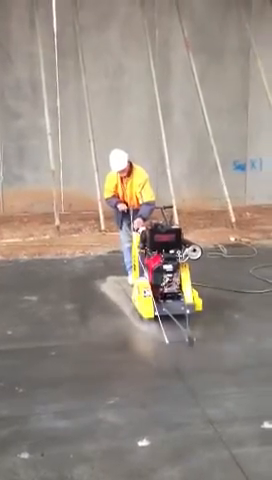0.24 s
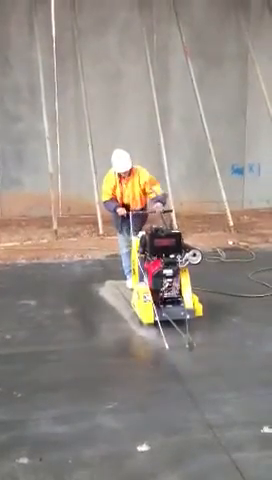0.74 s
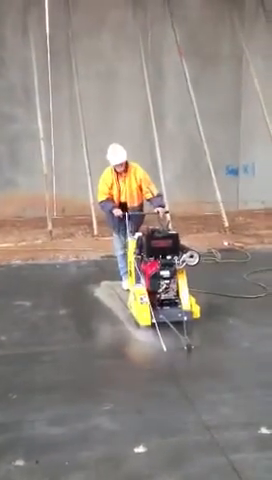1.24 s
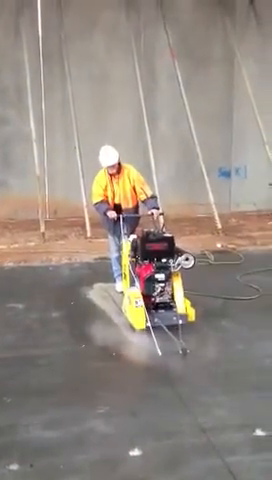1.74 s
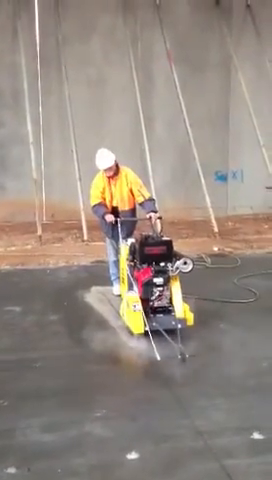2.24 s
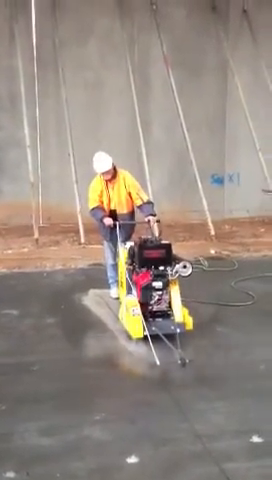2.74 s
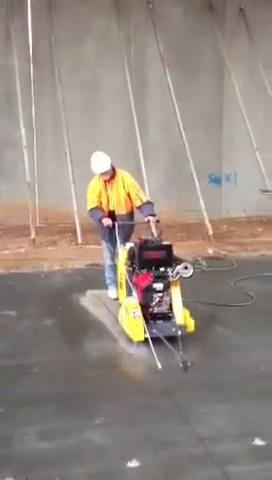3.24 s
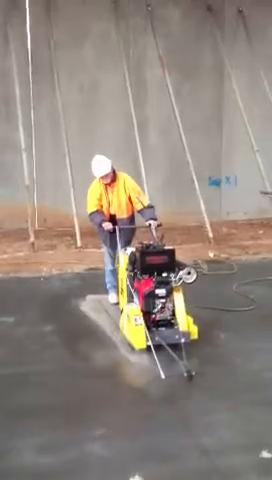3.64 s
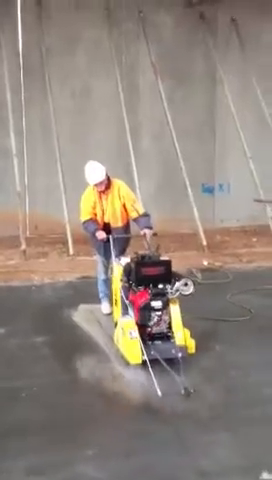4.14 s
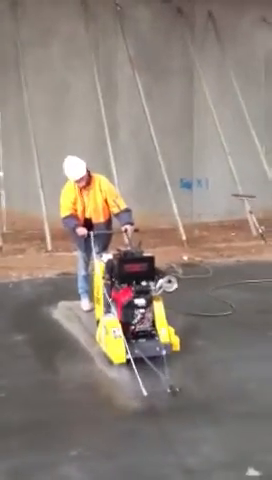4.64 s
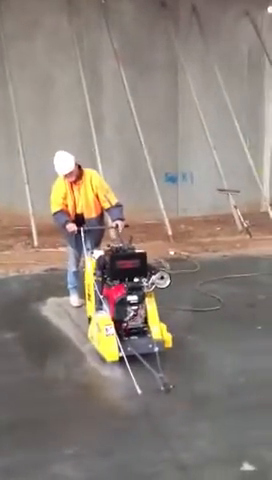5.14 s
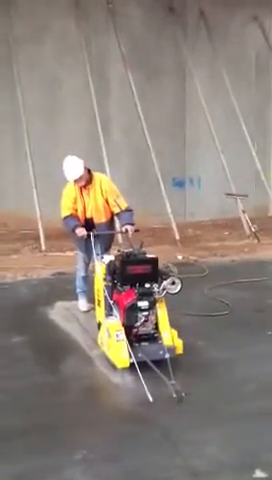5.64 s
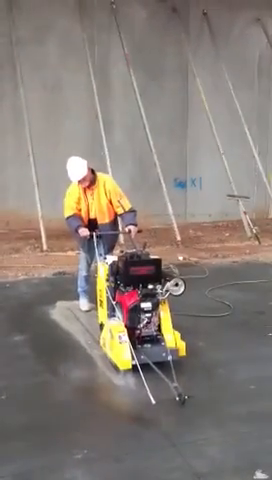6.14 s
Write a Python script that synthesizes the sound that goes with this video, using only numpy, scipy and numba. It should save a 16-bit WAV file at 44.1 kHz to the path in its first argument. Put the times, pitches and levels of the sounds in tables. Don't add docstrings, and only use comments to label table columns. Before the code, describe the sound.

Continuous bright, gritty shriek of a diamond blade grinding concrete, with an unsteady petrol engine throbbing quietly underneath, heard from some metres away.

```python
import sys
import numpy as np
from scipy import signal
from scipy.fft import rfft, irfft
from scipy.io import wavfile
from scipy.ndimage import uniform_filter1d
from numba import njit

SR = 44100
rng = np.random.default_rng(int(sys.argv[2]) if len(sys.argv) > 2 else 0)


def materialize(psi):
    bounded = np.clip(np.atleast_2d(psi).T, -1, 1)
    quanta = np.round(bounded * 32767).astype(np.int16)
    wavfile.write(sys.argv[1], SR, quanta)


def volts_from_db(level):
    exponent = np.asarray(level, float) / 20
    return 10 ** exponent


N = 282240
TIME = np.arange(N) / SR


def level(x, db):
    return x * volts_from_db(db) / np.sqrt(np.mean(x ** 2))


def curves(table):
    s, *columns = np.transpose(table)
    return [np.interp(TIME, s, c) for c in columns]


def walk(rate_hz):
    hold = int(SR / rate_hz)
    steps = np.repeat(rng.standard_normal(N // hold + 1), hold)
    return 1.3 * uniform_filter1d(uniform_filter1d(steps, hold), hold)[:N]


def bump(centre_s, length_s):
    return np.exp(-(2 * (TIME - centre_s) / length_s) ** 2)


def colour(x, points, lo_hz, hi_hz):
    hz = np.arange(1, N // 2 + 2) * SR / N
    points_hz, points_db = np.array(points).T
    db = np.interp(np.log(hz), np.log(points_hz), points_db)
    edges = 1 / np.sqrt((1 + (lo_hz / hz) ** 12) * (1 + (hz / hi_hz) ** 12))
    return irfft(rfft(x) * volts_from_db(db) * edges, N)


@njit
def svf(x, hz, width):
    y, band, low = np.empty(len(x)), 0., 0.
    for i in range(len(x)):
        g, k = np.tan(np.pi * hz[i] / SR), width / hz[i]
        v = (band + g * (x[i] - low)) / (1 + g * (g + k))
        band, low, y[i] = 2 * v - band, low + 2 * g * v, k * v
    return y


def grit(scatter_db):
    size_db = scatter_db * uniform_filter1d(rng.standard_normal(N), size=24)
    return rng.standard_normal(N) * volts_from_db(size_db)


def mode(scratch, hz, width_hz):
    centre_hz = hz * (1 + 0.0022 * walk(4.0))
    once = svf(scratch, centre_hz, 1.37 * width_hz)
    return level(svf(once, centre_hz, 1.37 * width_hz), 0)


def blade_ring(depth):
    # centre in Hz, width in Hz,
    # level in dB with the blade shallow, half in, deep.
    blade_modes = [(1700, 80, -24, -23.5, -25), (1922, 40, -24, -24.5, -28), (2035, 50, -23, -24.5, -27),
                   (2450, 60, -29, -29.0, -34), (2885, 70, -24, -27.0, -33), (3720, 140, -14, -17.5, -22),
                   (3850, 80, -20, -21.0, -22), (4030, 60, -20, -23.0, -21), (4262, 70, -17, -16.5, -24),
                   (4400, 80, -20, -21.0, -22), (4750, 110, -16, -17.0, -15), (4872, 60, -14, -14.0, -19)]
    higher_modes = [(5300, 80, -16, -15.0, -13), (5390, 70, -19, -15.0, -14), (5492, 60, -14, -14.0, -11),
                    (5985, 100, -15, -13.5, -12), (6135, 90, -13, -13.0, -12),
                    (6820, 130, -22, -20.5, -18), (7290, 90, -18, -17.0, -18), (7388, 70, -17, -17.5, -20),
                    (7720, 80, -20, -24.5, -28), (8164, 70, -24, -24.5, -26), (8390, 80, -21, -24.0, -25),
                    (8640, 80, -21, -21.0, -23), (9325, 80, -25, -23.5, -20), (9800, 80, -21, -24.0, -28)]
    # centre in seconds, length in seconds, mode in Hz, boost in dB.
    sings = [(1.87, .25, 4262, 7), (1.15, .2, 4262, 4), (2.55, .3, 5492, 4), (3.05, .3, 5492, 4),
             (2.05, .2, 4872, 4), (2.7, .3, 4872, 3), (4.0, .2, 4872, 4), (3.55, .3, 1922, 5),
             (5.3, .6, 5492, 2.5), (4.5, .5, 5985, 2.5)]
    scratch = grit(5.9)
    ring = np.zeros(N)
    for k, (hz, width_hz, *depth_db) in enumerate(blade_modes + higher_modes):
        mode_db = np.interp(depth, (.1, .5, .9), depth_db) + 1.0 * walk(9) + .3 * walk(2.5)
        for s, length_s, sing_hz, boost_db in sings:
            if sing_hz == hz:
                mode_db = mode_db + boost_db * bump(s, length_s)
        own_scratch = np.roll(scratch, k * SR // 5)
        ring += volts_from_db(mode_db) * mode(own_scratch, hz, width_hz)
    return ring


def blade():
    # frequency in Hz, level in dB per Hz.
    scrape_points = [(820, -49), (1400, -12.5), (1710, -10), (2620, -12.5), (3200, -9), (3710, -4),
                     (6110, -3), (7310, -5.5), (7760, -7.5), (10500, -5.5), (12300, -11), (13800, -11),
                     (15100, -15.5)]
    # centre in seconds, change in dB, length in seconds.
    bites = [(0.332, -1.5, 0.18), (0.883, -4.5, 0.091), (1.26, -2.5, .06), (1.54, -4.5, 0.066),
             (1.72, 2, 0.041), (1.85, -3, .1), (1.973, 2, .05), (2.127, -1.5, 0.075), (2.208, 3.5, 0.035),
             (2.523, 2, .06), (3.01, 3, 0.034), (3.25, -2, .08), (3.62, 2.6, 0.15), (3.795, 0.5, .06),
             (3.9, -3.5, 0.053), (3.99, 0, 0.07), (4.144, -4, .14), (4.85, -1.5, .1), (5.478, 2, .05),
             (5.59, -2, 0.11), (6.4, -1, 0.042)]
    # low edge in Hz, high edge in Hz, level in dB shallow, half in, deep,
    # share of each bite.
    rim_layers = [
        (1580, 2780, -27.5, -28, -29, 0.64),
        (3420, 7470, -15.5, -15.5, -16, 0.73),
        (8130, 30000, -23.2, -21.5, -22, 0.51),
    ]
    bite_db = sum(db * bump(s, length_s) for s, db, length_s in bites)
    depth = TIME / TIME[-1]
    chatter = volts_from_db(.35 * walk(12) + .5 * walk(30))
    scrape = level(colour(grit(5.3), scrape_points, 1, SR), -0.57)
    both = chatter * (scrape + level(blade_ring(depth), -4.0))
    flat = [(1, 0), (SR, 0)]
    cut = np.zeros(N)
    for lo_hz, hi_hz, *depth_db, share in rim_layers:
        layer_db = np.interp(depth, (.1, .55, .75), depth_db) + share * bite_db + 0.5 * walk(9)
        cut += volts_from_db(layer_db) * level(colour(both, flat, lo_hz, hi_hz), 0)
    return cut


def exhaust(cycle_hz, phase):
    # multiple of the cycle, level in dB.
    firing = [(3, -20), (4, -33), (5, 2), (6, 2.5), (7, -6), (8, -5), (9, -2), (10, -15), (11, -5),
              (12, -6), (13, -20), (14, -11), (15, -4), (16, -7), (17, -20), (18, -15)]
    # centre in Hz, width in Hz, boost in dB.
    muffler = [(144, 16, 3), (171, 16, 4), (222, 14, 11), (314, 14, 12), (345, 14, 5), (431, 13, 8.5)]
    partials = []
    for multiple, db in firing:
        boost_db = sum(b / (1 + (2 * (multiple * cycle_hz - f) / w) ** 2) for f, w, b in muffler)
        unsteady = .07 * multiple
        partial_db = db + boost_db + 1.4 * unsteady * walk(5)
        angle = multiple * phase + .17 * multiple ** 2 + .3 * unsteady * walk(9)
        partials.append(volts_from_db(partial_db) * np.cos(angle))
    return partials


def engine():
    # time in seconds, engine cycles per second.
    speed = [(0, 28.1), (.3, 27.3), (.88, 29.5), (1.08, 28.3), (1.29, 25.7), (1.48, 26.8), (1.76, 29.6),
             (1.96, 29.9), (2.37, 26.3), (2.72, 29.4), (3.15, 28.6), (3.68, 28.1), (4.0, 26.0),
             (4.48, 29.1), (4.92, 29.4), (5.61, 27.9), (6.15, 27.7), (6.4, 28.2)]
    # time in seconds, exhaust level in dB.
    throttle = [(0, -31), (.27, -32), (.5, -32), (.78, -29.5), (.92, -33.5), (1.1, -30.5), (1.5, -29),
                (1.68, -29), (2.02, -33.5), (2.6, -30.5), (3.1, -31.5), (3.8, -33), (4.13, -31),
                (4.3, -28.5), (5.02, -35.5), (5.4, -33.5), (6.08, -35), (6.3, -31)]
    # frequency in Hz, level in dB per Hz.
    casing_points = [(15, -45), (30, -50), (75, -33), (118, -29), (135, -8.5), (250, -8.5), (400, -17),
                     (500, -17), (720, -8), (870, -10), (980, -13.5), (1200, -13), (1300, -9), (1500, -19)]
    # level in dB at half throttle, share of the throttle swing,
    # drift in dB per second as the machine creeps off.
    layer_levels = [
        (-34.5, 0.59, -.2),
        (-35, 1.4, -.5),
        (-38.5, 0.86, 0.34),
        (-35, 0.63, -0.37),
    ]
    flywheel_s, half_open_db = .1, -32
    cycle_hz = uniform_filter1d(curves(speed)[0], size=int(flywheel_s * SR))
    swing_db = curves(throttle)[0] - half_open_db
    phase = 2 * np.pi * np.cumsum(cycle_hz) / SR
    partials = exhaust(cycle_hz, phase)
    noise = rng.standard_normal(N) * (1 + .3 * np.cos(phase))

    def rumble(lo_hz, hi_hz, db):
        return level(colour(noise, casing_points, lo_hz, hi_hz), db)

    slab = rumble(1, 108, -18.0) * volts_from_db(3.5 * walk(23))
    thud = level(sum(partials[:4]), -.3) + rumble(125, 185, -15) + slab
    drone = level(sum(partials[4:10]), -1) + rumble(185, 365, -8.5)
    buzz = level(sum(partials[10:]), -2.2) + rumble(365, 490, -4.2)
    casing = rumble(554, 1490, -0.047) * volts_from_db(.6 * walk(5) + 1.2 * walk(25))
    mix = np.zeros(N)
    for (db, share, drift), layer in zip(layer_levels, (thud, drone, buzz, casing)):
        mix += volts_from_db(db + share * swing_db + drift * TIME) * layer
    return mix


def bounce(x):
    return x + .07 * np.roll(x, 30)


def shed(x, t60_s, wet_db):
    decay = volts_from_db(-60 * TIME[:SR] / t60_s)
    tail = level(rng.standard_normal(SR) * decay, wet_db) / np.sqrt(SR)
    return x + signal.fftconvolve(x, tail)[:N]


def scene():
    mono = shed(bounce(blade()), .45, -18) + shed(engine(), .8, -19)
    return np.tile(mono, (2, 1))


def starve(x):
    # centre in Hz, width in Hz, odds at first, odds
    notches = [(7900, 90, -2.2, -1.3), (8950, 90, -2.2, -1.4), (10900, 120, -2, -1.4),
               (12400, 200, -1.8, -.8), (13100, 150, -2, -1.1), (13700, 200, -1.8, -.8),
               (14450, 180, -1.4, -.6), (14650, 320, -1, .1), (15060, 170, -1.8, -.5)]
    hz, s, cells = signal.stft(x, SR, nperseg=2048, noverlap=1536)
    for centre_hz, width_hz, first, later in notches:
        odds = np.interp(s, (1, 3.5), (first, later))
        out = odds + np.interp(s, TIME, walk(30)) > 0
        cells[np.ix_(abs(hz - centre_hz) < .45 * width_hz, out)] = 0
    coarse = rng.random((len(hz) // 4 + 1, len(s) // 4 + 1))
    dice = np.kron(coarse, np.ones((4, 4)))[:len(hz), :len(s)]
    chance_by_hz = np.interp(hz, (6000, 8000, 15000), (0, .04, .17))
    chance_by_time = np.interp(s, (1, 3), (.3, 1))
    cells[dice < np.outer(chance_by_hz, chance_by_time)] = 0
    return signal.istft(cells, SR, nperseg=2048, noverlap=1536)[1][:N]


def stereo_refills(mid):
    # centre in seconds, low edge in Hz, high edge in Hz.
    refills = [(.772, 5080, 6350), (.772, 7490, 9020), (.772, 12360, 13800), (1.515, 5080, 6350),
               (4.116, 8870, 10380), (4.348, 4130, 5230), (4.348, 6200, 7620), (4.348, 10290, 12360),
               (4.394, 12340, 13800), (4.511, 9560, 11760), (4.603, 7500, 9000), (4.603, 10260, 12420),
               (4.650, 4130, 5220), (5.625, 5080, 6330), (5.625, 7520, 8980)]
    side, frame = np.zeros(N), 2048
    for s, lo_hz, hi_hz in refills:
        i = int(s * SR) - frame // 2
        earlier = mid[i - 3 * frame:i - 2 * frame] * np.hanning(frame)
        band = signal.butter(6, (lo_hz, hi_hz), "band", fs=SR, output="sos")
        side[i:i + frame] += volts_from_db(-2.0) * signal.sosfiltfilt(band, earlier)
    return side


def top_cut(x):
    return signal.sosfilt(signal.butter(12, 15330, fs=SR, output="sos"), x)


def record(dry):
    bass_cut = signal.butter(1, 30, "high", fs=SR, output="sos")
    mid = starve(signal.sosfilt(bass_cut, np.tanh(1.15 * dry[0]) / 1.15))
    side = stereo_refills(mid)
    return top_cut(np.array([mid + side, mid - side]))


dry = scene()
out = record(dry)
materialize(out)
```